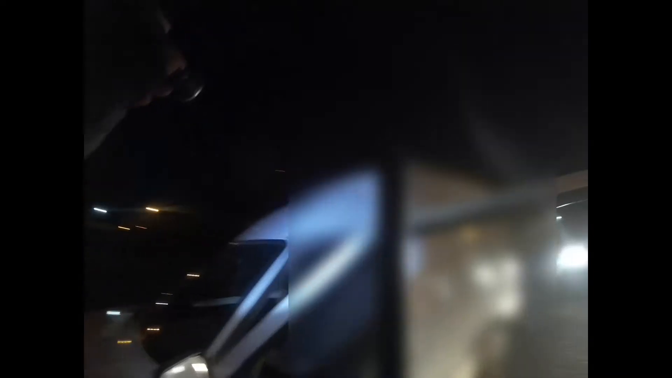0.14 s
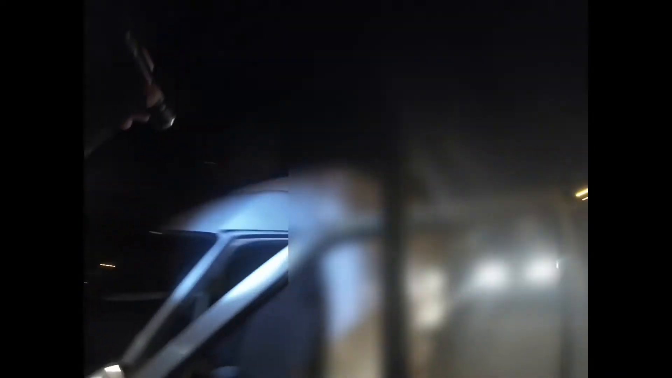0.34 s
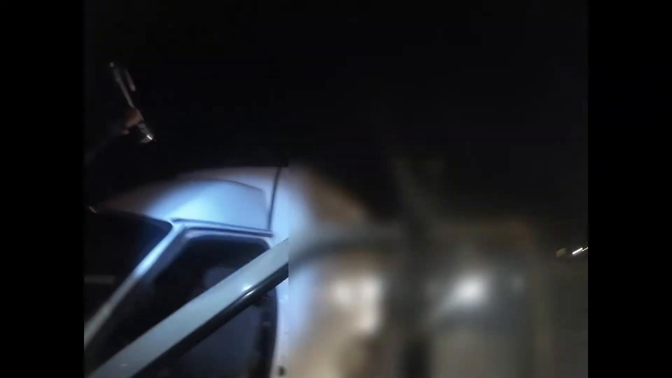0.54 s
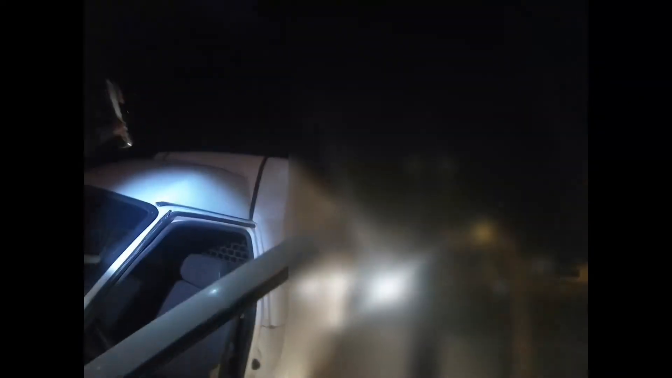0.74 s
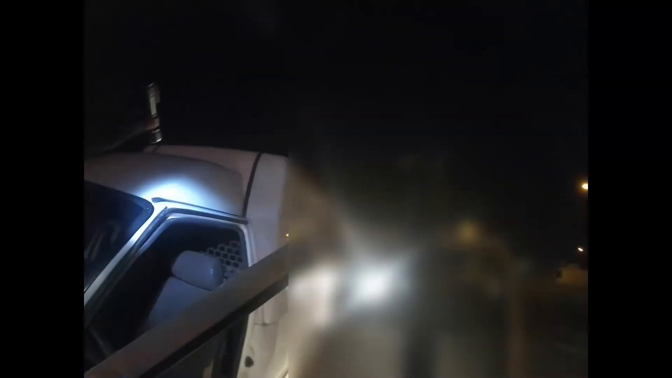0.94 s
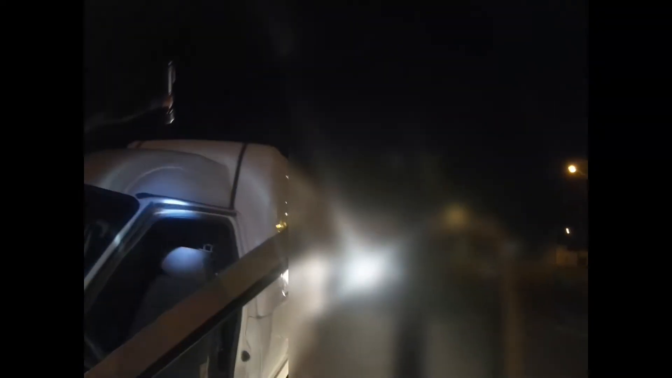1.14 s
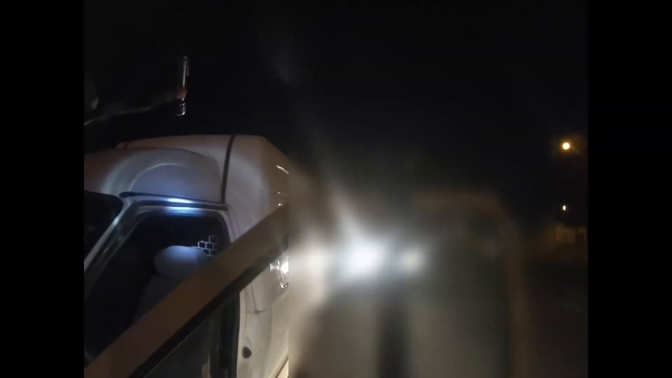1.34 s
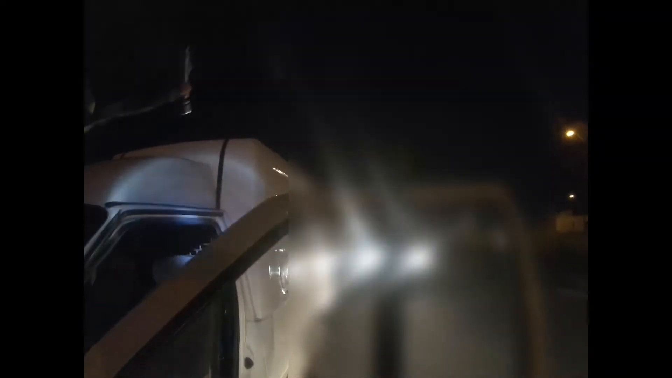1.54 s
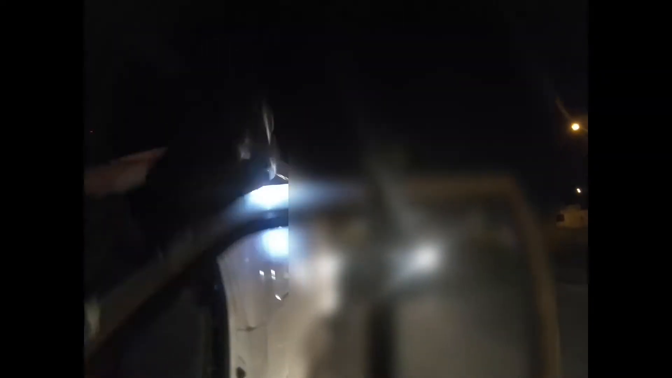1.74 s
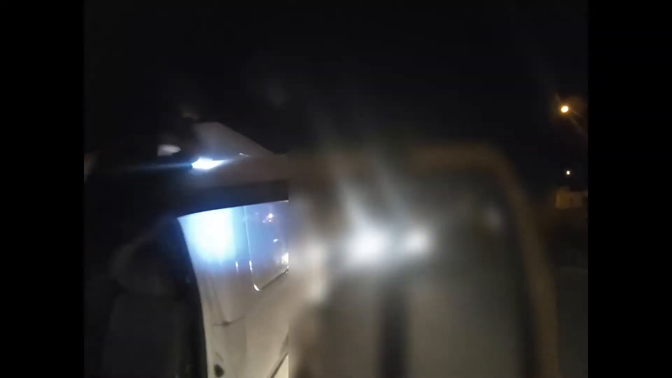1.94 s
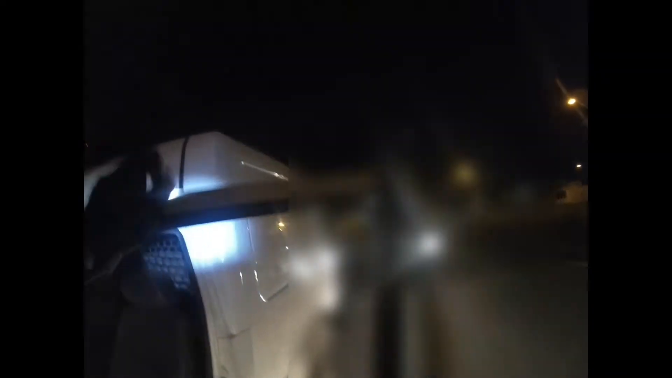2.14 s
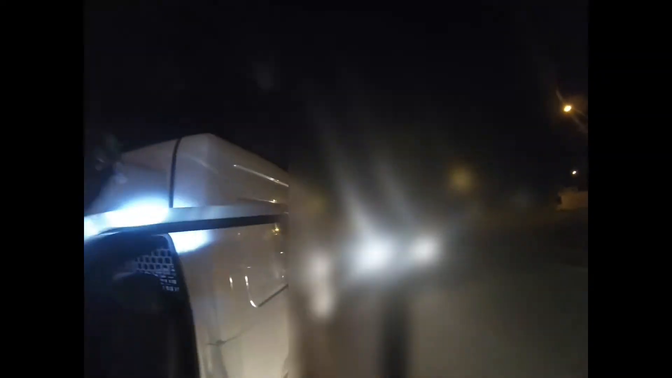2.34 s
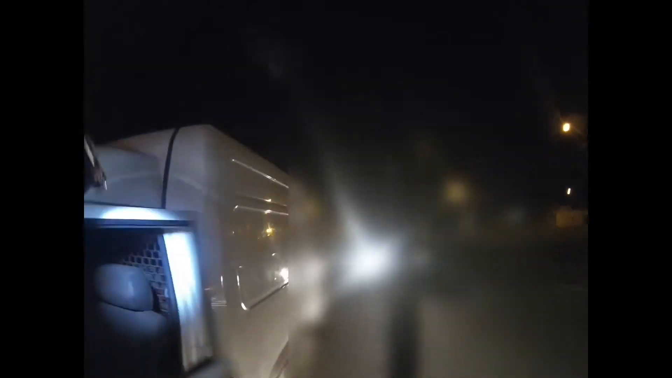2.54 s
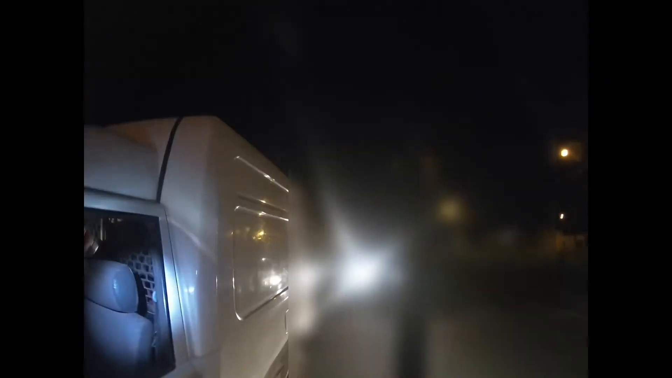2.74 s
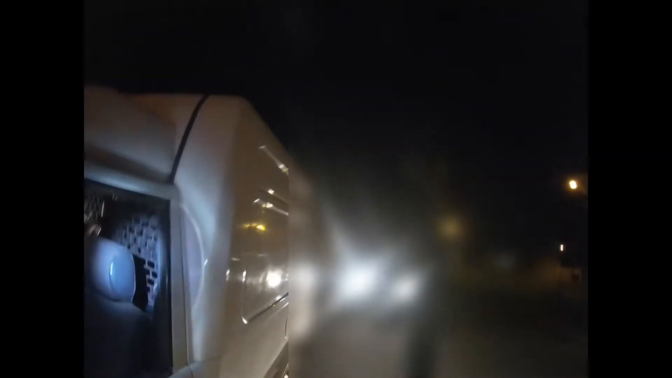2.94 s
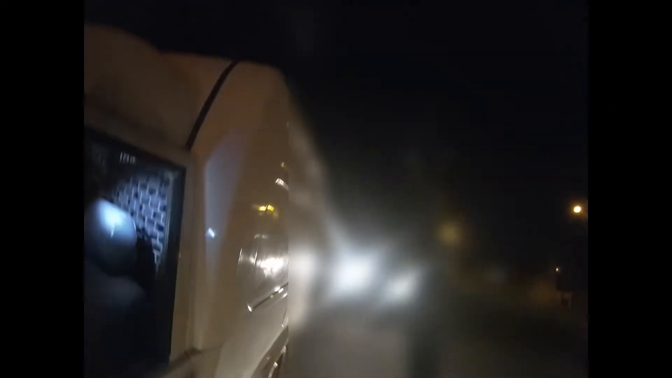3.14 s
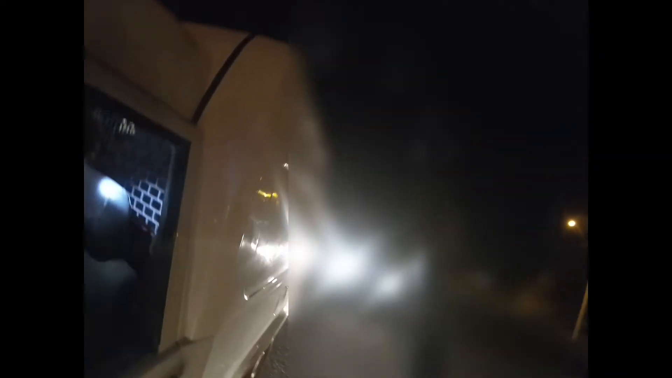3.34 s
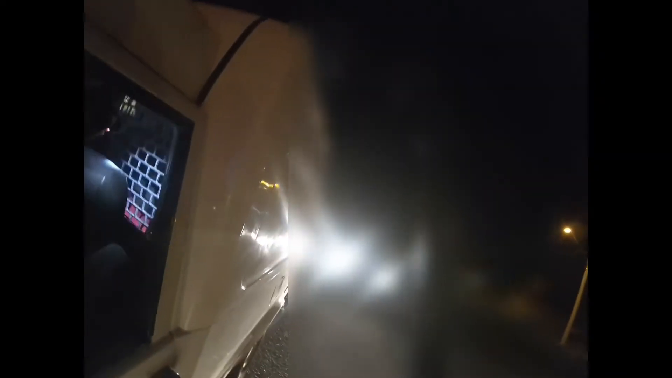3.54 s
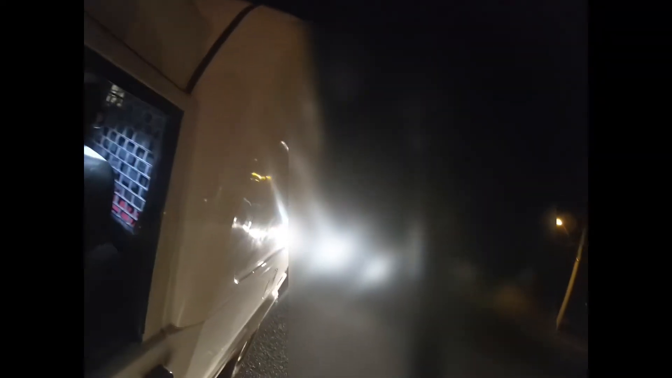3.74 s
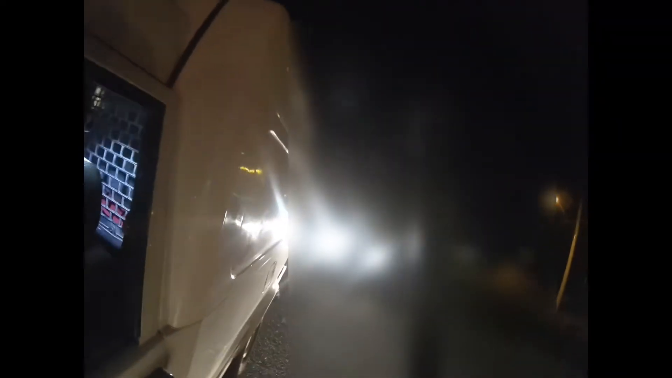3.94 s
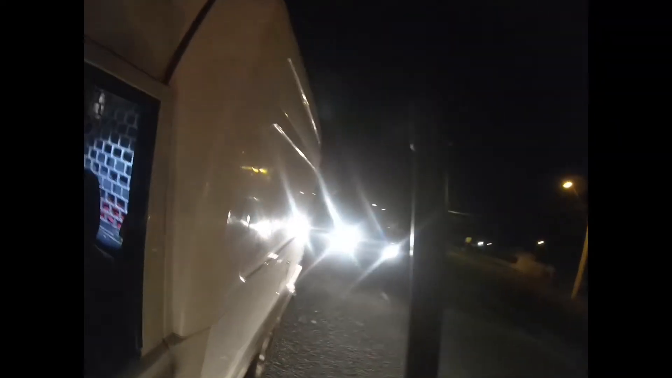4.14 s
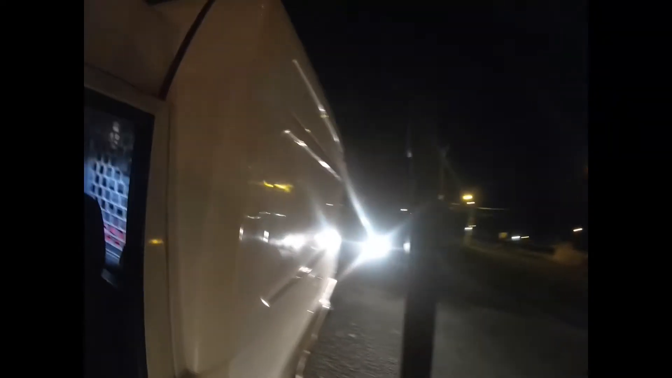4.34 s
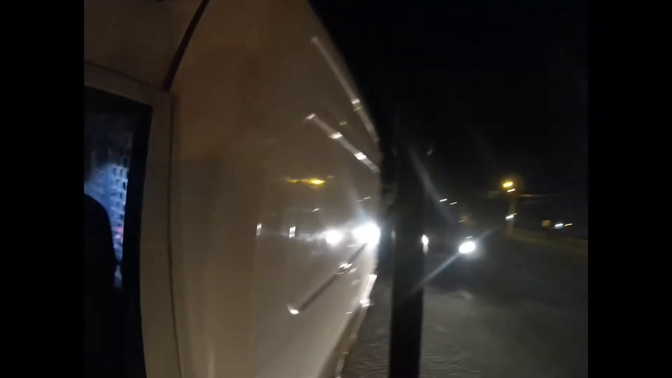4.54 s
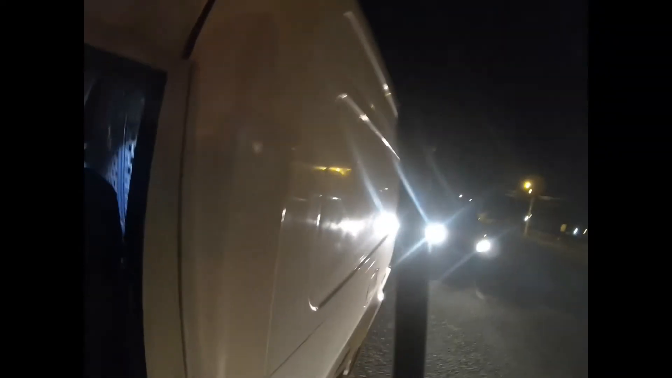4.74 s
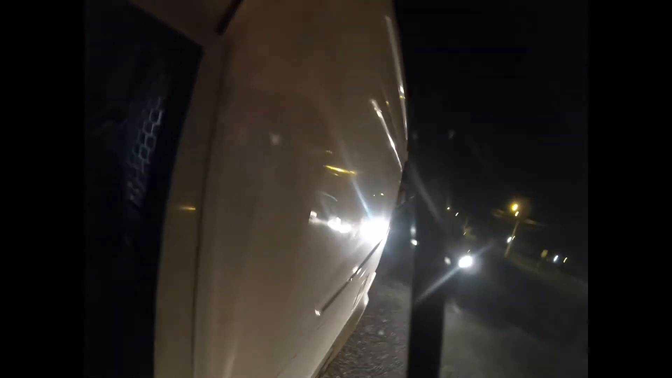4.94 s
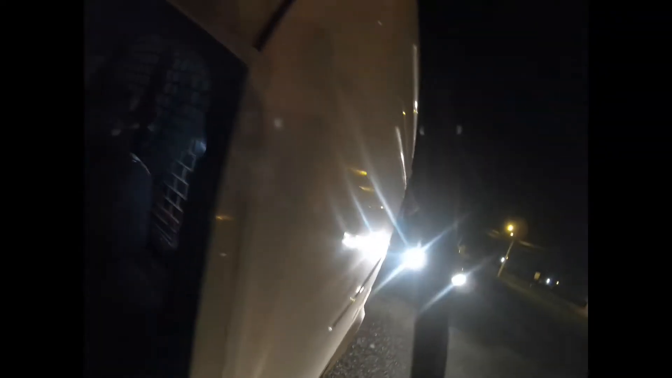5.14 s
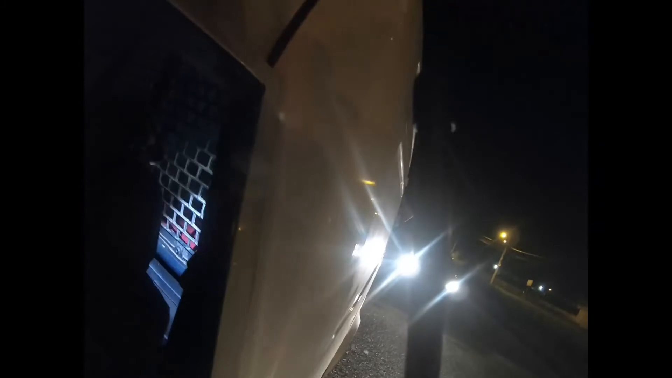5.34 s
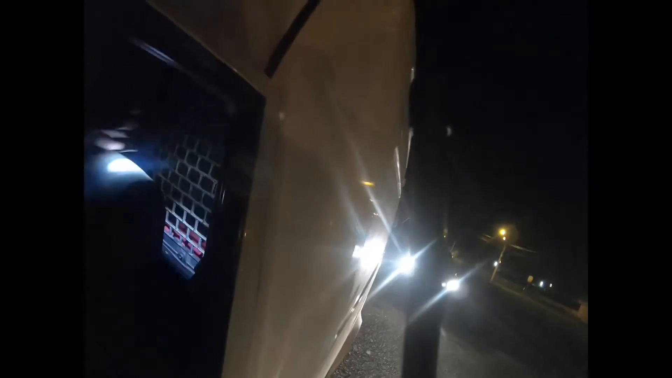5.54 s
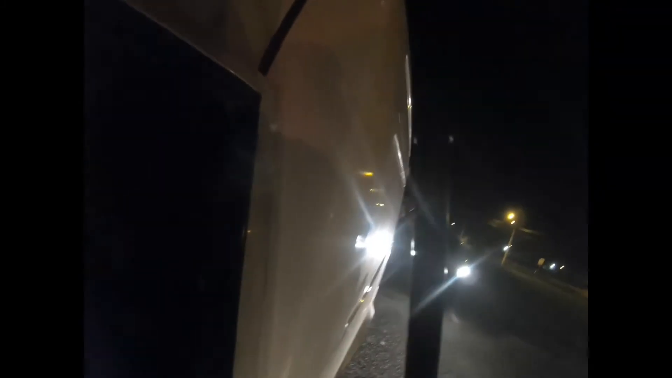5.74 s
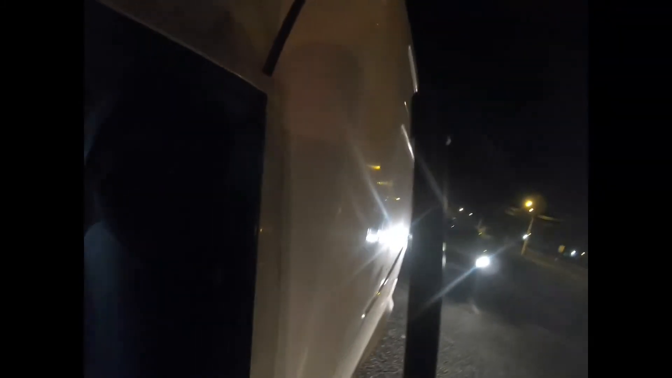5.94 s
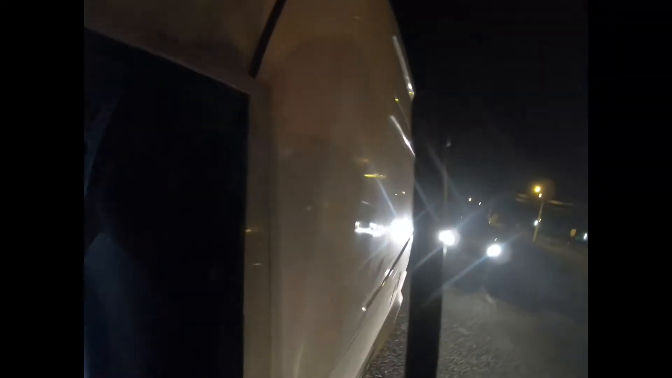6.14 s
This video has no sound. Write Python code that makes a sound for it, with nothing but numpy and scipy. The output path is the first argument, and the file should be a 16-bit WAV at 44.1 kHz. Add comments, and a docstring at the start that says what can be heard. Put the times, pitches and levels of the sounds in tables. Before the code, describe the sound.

A small camera microphone a step from a van picks up road rumble, a lorry pulling away and faint brake squeals. Hands bump the camera; the door latch snaps crisply, then the door slams with a deep thump, quick rebounds and shaking trim and glass. The sound dies quickly with a short street tail. Distant traffic returns, a car revs upward far off, and wind thumps mostly on the right.

```python
"""A van door is unlatched and slammed a step from a small two-port camera beside a road.
Each blow and rebound rings damped panel modes and shakes a noise rattle; the cab air booms at a rising pitch.
The latch clicks with short modes and noise; hands knock the housing and wind puffs on its right port.
Far off, engines are wavering sine orders, brakes and tyre tread are narrow wavering tones,
and the road is coloured noise in half-octave bands."""
import sys
import numpy as np
from scipy import signal
from scipy.fft import rfft, irfft, next_fast_len
from scipy.io import wavfile
from scipy.ndimage import uniform_filter1d

SR = 44100
rng = np.random.default_rng(int(sys.argv[2]) if len(sys.argv) > 2 else 0)


def dump(signal):
    """Clip the signal to [-1, 1] and save it as 16-bit WAV at the path in sys.argv[1]."""
    limited = np.clip(np.atleast_2d(signal).T, -1, 1)
    pcm = np.round(limited * 32767).astype(np.int16)
    wavfile.write(sys.argv[1], SR, pcm)


N = 272229


def undb(db):
    """Decibels to amplitude."""
    return 10 ** (np.asarray(db) / 20)


def unit(x):
    """Scale to an RMS of 1."""
    return x / np.sqrt(np.mean(x ** 2))


def decay(t60, t):
    """Exponential fade that loses 60 dB in t60 seconds."""
    return 10 ** (-3 * t / t60)


def ring(hz, t60, t):
    """One struck mode: a decaying sine."""
    return np.sin(2 * np.pi * hz * t) * decay(t60, t)


def add(out, s, x):
    """Mix x into out from time s, cut at the end."""
    i = int(s * SR)
    out[..., i:i + x.shape[-1]] += x[..., :out.shape[-1] - i]


def curves(table):
    """Table columns joined in time, then a gate that fades 23 ms beyond the table's ends."""
    s, *columns = np.transpose(table)
    t = np.arange(N) / SR
    inside = np.clip(np.minimum(t - s[0], s[-1] - t) / 0.023 + 1, 0, 1)
    return [np.interp(t, s, c) for c in columns] + [inside]


def over_hz(table, hz):
    """Table columns joined on a log-frequency axis."""
    f, *columns = np.transpose(table)
    return [np.interp(np.log(hz + 1), np.log(f), c) for c in columns]


def shape(x, gain):
    """Filter by a function of frequency; the ends are mirrored so that they do not click."""
    pad = 2048
    size = next_fast_len(N + 2 * pad)
    x = np.pad(x, [(0, 0)] * (x.ndim - 1) + [(pad, pad)], mode="reflect", reflect_type="odd")
    hz = np.arange(size // 2 + 1) * SR / size
    return irfft(rfft(x, size) * gain(hz), size)[..., pad:N + pad]


def band_noise(order, edges_hz):
    """Band-passed noise at unit RMS."""
    sos = signal.butter(order, edges_hz, "band", fs=SR, output="sos")
    return unit(signal.sosfilt(sos, rng.standard_normal(N)))


def walk(rate):
    """Random levels held 1 / rate s and slewed twice; spread near 1."""
    k = int(SR / rate)
    held = np.repeat(rng.standard_normal(N // k + 1), k)
    return 1.277 * uniform_filter1d(uniform_filter1d(held, k), k)[:N]


def swell(s, rise_s, fall_s):
    """A bell in time, 1 at its top."""
    t = np.arange(N) / SR - s
    return np.exp(-.5 * (t / np.where(t < 0, rise_s, fall_s)) ** 2)


def whistle(hz, width_hz):
    """A carrier under a slow random envelope that widens the line."""
    turn = np.exp(2j * np.pi * np.cumsum(hz) / SR)
    return unit(walk(width_hz) * turn.real + walk(width_hz) * turn.imag)


# The housing shades the ports: (frequency [Hz], left minus right [dB], left leads by [rad])
PORT_SHADING = [(60, 0, 0), (200, -2, -.3), (400, -5, -.2), (700, -5, .6), (1200, -1, 2.1), (2200, 2, 1.8),
                (3300, 0, .5), (4500, -1, .2), (8000, -1.5, 0), (15000, 0, 0)]


def ports(x):
    """One sound as the two ports hear it: half the shading and half the phase to each side."""
    def gain(hz):
        db, lead = over_hz(PORT_SHADING, hz)
        half = undb(db / 2) * np.exp(.5j * lead)
        return np.array([half, 1 / half])
    return shape(x, gain)


def shade(own):
    """Sound that reaches each port alone is shaded too, in level only."""
    return shape(own, lambda hz: undb(over_hz(PORT_SHADING, hz)[0] * np.array([[.5], [-.5]])))


def spread_gain(colour, alike, hz):
    """Spectra of one common noise and two port-only noises, sharing the power."""
    share = np.clip(over_hz(alike, hz)[0], 0, 1)
    return undb(over_hz(colour, hz)[0]) * np.sqrt([share, 1 - share, 1 - share])


def scattered(colour, alike):
    """Coloured noise from a wide surface: a share reaches both ports alike, the rest each port alone."""
    noise = rng.standard_normal((3, N))
    common, *own = shape(noise, lambda hz: spread_gain(colour, alike, hz))
    return unit(ports(common) + shade(np.array(own)))


PASS_S, PASS_RISE_S = 1.09, 0.38  # a car passes, heard in the road noise and the tread hum
ROAD_PASS_FALL_S = 0.9
GUST_S, GUST_RISE_S, GUST_FALL_S = 4.81, 0.43, 0.33
NEAR_S, NEAR_RISE_S = 6.26, 0.66  # the speeding car nears
BASS_FLICKER_DB, TREBLE_FLICKER_DB = 2, .8
# Borders between the road's level bands: frequencies [Hz]
ROAD_BAND_EDGES = (150, 400, 800, 1700, 2300, 4500)
# Road noise per band, bass first:
# (level [dB], rise as a car passes [dB], rise in the gust [dB], rise as the speeding car nears [dB])
ROAD_BAND_LEVELS = [(-32.5, -3, 5.5, 1.5), (-45.5, -0.5, 4.5, 5.5), (-54.5, 1.5, 3.5, 6),
                    (-56.5, 2.5, 2, -2.5), (-64.5, 4.5, 2.5, 4.5), (-68.5, -1, 3, 8.5), (-70.5, 1.5, 6, 4)]
# Rumble and tyre roar from the road, before band levelling: (frequency [Hz], density [dB per Hz])
ROAD_SPECTRUM = [(15, -37.5), (25, -4), (59, -3), (128, -7.5), (220, -16.5), (363, -27.5), (620, -28.5),
                 (900, -37), (1600, -37), (2500, -42), (3700, -45.5), (4700, -53.5), (6300, -48.5),
                 (8500, -50), (12500, -63.5), (15000, -70)]
# Likeness of the road at the two ports: (frequency [Hz], common share of power [0-1])
ROAD_COMMON = [(30, 0.75), (130, 0.87), (300, 0.95), (700, 0.3), (1400, 0.63), (3000, 0.67), (5000, 0.14),
               (7000, 0.91), (15000, 1)]


def road():
    """Rumble and roar: half-octave noise bands flicker alone and swell together in seven level bands."""
    car_passes = swell(PASS_S, PASS_RISE_S, ROAD_PASS_FALL_S)
    gust = swell(GUST_S, GUST_RISE_S, GUST_FALL_S)
    car_nears = swell(NEAR_S, NEAR_RISE_S, 1)
    levels = np.array(ROAD_BAND_LEVELS) @ np.array([np.ones(N), car_passes, gust, car_nears])

    size = next_fast_len(N)
    hz = np.arange(size // 2 + 1) * SR / size
    spectrum = rfft(rng.standard_normal((3, size))) * spread_gain(ROAD_SPECTRUM, ROAD_COMMON, hz)
    layers = np.zeros((len(levels), 3, N))
    for centre in 22 * 2 ** np.arange(0, 10, .5):
        octaves = np.log2((hz + 1) / centre)
        window = np.cos(np.pi / 2 * np.clip(2 * octaves, -1, 1)) ** 2
        band = irfft(spectrum * window, size)[:, :N]
        flicker_db = TREBLE_FLICKER_DB if centre > 600 else BASS_FLICKER_DB
        layers[np.searchsorted(ROAD_BAND_EDGES, centre)] += band * undb(flicker_db * walk(11))

    total = 0
    for db, layer in zip(levels, layers):
        # one port hears the common noise and one port-only noise
        port_rms = np.sqrt(np.mean(np.sum(layer[:2] ** 2, axis=0)))
        total = total + undb(db) * layer / port_rms
    return ports(total[0]) + shade(total[1:])


def tone(hz, db, wobble=0.00604, waver_db=1.0):
    """An engine line: a sine whose pitch and level waver a little."""
    level = np.sqrt(2) * undb(db + waver_db * walk(5.5))
    return level * np.sin(2 * np.pi * np.cumsum(hz * (1 + wobble * walk(5))) / SR)


# Second far engine: (time [s], line frequency [Hz], level [dB])
FAR_ENGINE = [(0, 126.8, -62), (2.5, 140.7, -44.5), (4.2, 148.3, -44), (6.17, 139.6, -45.5)]


def far_engine():
    """The firing line of an engine far down the road, followed in pitch and level."""
    hz, db, _ = curves(FAR_ENGINE)
    return tone(hz, db)


LORRY_HZ, LORRY_HZ_PER_S = 39.1, 6.9  # firing line at the start, and its climb
# Lorry's firing line: (time [s], level [dB])
LORRY_LINE = [(0, -71), (.25, -34), (1.6, -37.5), (2, -30), (2.6, -37.5), (3.1, -34.5), (3.6, -33.5),
              (4.4, -35.5), (4.7, -45), (4.9, -65)]


def lorry():
    """A lorry's firing line climbs steadily as it pulls away."""
    db, inside = curves(LORRY_LINE)
    return inside * tone(LORRY_HZ + LORRY_HZ_PER_S * np.arange(N) / SR, db)


# Distant car speeding up: (time [s], shaft rate [Hz])
CAR_SHAFT_RATE = [(2.9, 17), (3.7, 19.8), (4.1, 22.6), (4.7, 27.5), (5, 29), (5.1, 30.1), (5.25, 31.7),
                  (5.4, 33.4), (5.55, 34.1), (5.65, 35.1), (5.78, 36.1), (5.9, 36.9), (6.05, 37.8),
                  (6.2, 38.3)]
# Its level: (time [s], level [dB], extra for orders above the fifth [dB])
CAR_LEVEL = [(2.9, -34, -35), (3.7, -47, -32.5), (4.1, -38.5, -30), (4.7, -45, -19), (5.0, -36.5, -12),
             (5.22, -39, -4), (5.45, -30.5, -6.5), (5.65, -45, -0.5), (5.9, -42, 0.5), (6.08, -40, 1),
             (6.2, -38.5, -3.5)]
# Its engine orders: (multiple of shaft rate, relative level [dB])
CAR_ORDER_LEVELS = [(2, -15), (3, -6.5), (4, -2.5), (5, -8.5), (6, -0.5), (7, -2), (10, -9), (11, -6),
                    (12, -15.5)]
# Its exhaust resonances: (frequency [Hz], gain [dB])
EXHAUST_GAIN = [(30, -20), (55, -10), (75, -15), (90, 7.5), (118, 6), (150, -4.5), (195, -7.5), (212, -0.5),
                (228, 4.5), (239, -17.5), (249, 4.5), (266, -5.5), (280, -12), (300, -14), (345, -14),
                (362, -8.5), (376, -4), (392, -13.5), (415, -34), (455, -9), (520, -14)]


def car():
    """The car's orders swell as they climb through its exhaust resonances."""
    shaft_hz, _ = curves(CAR_SHAFT_RATE)
    db, upper_db, inside = curves(CAR_LEVEL)
    out = np.zeros(N)
    for order, order_db in CAR_ORDER_LEVELS:
        hz = order * shaft_hz
        level = db + order_db + over_hz(EXHAUST_GAIN, hz)[0] + upper_db * (order > 5)
        out += inside * tone(hz, level, wobble=0.00504, waver_db=2.5)
    return out


TREAD_WANDER, TREAD_WAVER_DB = .01, 2.5  # fraction of pitch; level
TREAD_SWELL_DB, TREAD_FALL_S = 6.5, 0.82
# Tread hum of the passing car: (frequency [Hz], level before the swell [dB], envelope rate [Hz])
TREAD_HUM = [(905, -50, 100), (1190, -53, 130), (1000, -46, 600)]


def tread():
    """Tyre tread hums in wandering lines that swell with the passing car."""
    near = swell(PASS_S, PASS_RISE_S, TREAD_FALL_S)
    out = np.zeros(N)
    for hz, db, width_hz in TREAD_HUM:
        level = undb(db + TREAD_SWELL_DB * (near - 1.5) + TREAD_WAVER_DB * walk(6.83)) * np.sqrt(near)
        out += level * whistle(hz * (1 + TREAD_WANDER * walk(9)), width_hz)
    return out


SQUEAL_EDGE_S, SQUEAL_WAVER_DB = 0.085, 3
# Faint brake squeals: (time [s], swell [s], length [s], frequency [Hz], sag [Hz per s],
# level [dB], fade [dB per s], envelope rate [Hz])
BRAKE_SQUEALS = [(0.05, 0.16, 0.9, 7670, 140, -57.5, 11.5, 330), (0.852, 0.13, 0.51, 7570, 93, -72, 4, 396),
                 (2.835, 0.26, 0.77, 6250, 3.3, -56.5, 31.5, 90.5),
                 (4.658, 0.092, 0.39, 6220, 170, -63, 12, 90)]


def squeals():
    """Brake squeals sag in pitch and fade as the wheel slows."""
    out = np.zeros(N)
    for s, rise, length, hz, sag, db, fade_db, width_hz in BRAKE_SQUEALS:
        t = np.arange(N) / SR - s
        on = np.clip(np.minimum(t / rise, (length - t) / SQUEAL_EDGE_S), 0, 1)
        level = undb(db - fade_db * t + SQUEAL_WAVER_DB * walk(11))
        out += on * level * whistle(hz - sag * t, width_hz)
    return out


def buffeting():
    """Steady wind buffets each port alone as low, unevenly swelling noise."""
    noise = unit(shape(rng.standard_normal((2, N)), lambda hz: hz / (1 + (hz / 130) ** 3.35)))
    left_db, right_db = -48, -43
    return undb([left_db + 4.6 * walk(10.0), right_db + 4.6 * walk(13)]) * noise


PUFF_HZ, PUFF_SPREAD = 111.1, 0.097  # mean pitch; spread as a fraction
PUFF_RISE_S, PUFF_FALL_S = 0.00891, 0.01755
PUFF_RUSH_DB = -19  # rush under the thud
SMALL_PUFFS, SMALL_PUFF_DB, SMALL_PUFF_SPREAD_DB = 18, -23.5, 4.5
# Strong wind puffs on the right port: (time [s], level [dB])
STRONG_PUFFS = [(0.031, -18.5), (0.064, -14.5), (0.863, -20.5), (1.33, -17.5), (1.658, -26), (1.731, -17.5),
                (2.356, -15.5), (3.395, -15.5), (4.521, -19), (4.586, -14.5), (4.684, -8), (4.892, -13),
                (4.971, -15), (5.045, -10.5), (5.113, -8)]


def puffs():
    """Wind thuds on the right port in short low waves; the left takes a weak inverted share."""
    out = np.zeros((2, N))
    t = np.arange(-int(.03 * SR), int(.2 * SR)) / SR
    rush = unit(shape(rng.standard_normal(N), lambda hz: hz ** 2 / (1 + (hz / 200) ** 5.3)))
    small = []
    for _ in range(SMALL_PUFFS):
        s = .03 + (N / SR - .03) * rng.random()
        small.append((s, SMALL_PUFF_DB + SMALL_PUFF_SPREAD_DB * rng.standard_normal()))
    envelope = np.exp(-.5 * (t / np.where(t < 0, PUFF_RISE_S, PUFF_FALL_S)) ** 2)
    for s, db in STRONG_PUFFS + small:
        hz = PUFF_HZ * (1 + PUFF_SPREAD * rng.standard_normal())
        wave = np.cos(2 * np.pi * hz * t + 2 * np.pi * rng.random())
        # eddies tear off the rim and rush above the thud
        wave += undb(PUFF_RUSH_DB) * np.roll(rush, -int(s * SR))[:len(t)]
        add(out, s + t[0], undb(db) * np.array([[-.15], [1]]) * envelope * wave)
    return out


KNOCK_T60_S = 0.032
SCUFF_BAND_HZ, SCUFF_DB, SCUFF_T60_S = (220, 684), -11.5, 0.044  # rough body of a knock
# Knocks on the camera housing: (time [s], level [dB], frequency [Hz], left minus right [dB])
HOUSING_KNOCKS = [(0.263, -18.5, 405, -6), (.279, -23, 450, -10), (.291, -27, 405, 1),
                  (.302, -22.5, 428, -6), (4.579, -24, 300, -22), (4.62, -20, 327, -13.5),
                  (4.758, -28, 625, -8), (4.77, -29, 403, -5)]


def knocks():
    """Knocks ring two short modes of the housing with a noisy scuff."""
    out, t = np.zeros((2, N)), np.arange(int(.1 * SR)) / SR
    noise = band_noise(3, SCUFF_BAND_HZ)
    onset = np.sin(np.pi / 2 * np.minimum(t / 0.0032, 1)) ** 2
    for s, db, hz, pan_db in HOUSING_KNOCKS:
        modes = ring(hz, KNOCK_T60_S, t) + 0.29 * ring(1.28 * hz, KNOCK_T60_S, t)
        scuff = undb(SCUFF_DB) * noise[int(s * SR):][:len(t)] * decay(SCUFF_T60_S, t)
        levels = undb(db + np.array([[pan_db], [-pan_db]]) / 2)
        add(out, s, levels * (modes + scuff) * onset)
    return out


LATCH_RING_DB, LATCH_RING_SLOPE = -22, 1.45  # ring of the hardest click; dB of ring lost per dB of softer crack
# Latch and small clicks a step away: (time [s], crack level [dB], treble tick level [dB], t60 [s])
LATCH_CLICKS = [(.264, -50, -57, 0.039), (.282, -48, -62, 0.045), (0.662, -50.5, -59, 0.033),
                (1.251, -64, -53, 0.013), (1.319, -74, -55, 0.011), (1.338, -68, -51, .012),
                (1.8114, -40, -70, .02), (1.813, -21.5, -27.5, 0.017), (1.815, -33, -33, 0.011),
                (1.8175, -31.5, -48, 0.064), (1.829, -50, -57, 0.065), (1.84, -52, -51, 0.014),
                (1.852, -56, -47, 0.016), (2.1433, -40.5, -77, 0.068), (3.329, -53, -52, 0.011),
                (4.02, -62, -56.5, 0.046), (4.578, -68, -52, 0.038), (4.752, -45.5, -70, 0.067),
                (4.759, -44, -73, 0.07), (4.767, -47, -79, 0.05), (4.927, -75, -52, .02),
                (5.03, -61, -53, 0.018), (5.799, -55, -69, 0.024)]
# Latch modes: (frequency [Hz], relative level [dB], t60 [s])
LATCH_MODES = [(215, -9.5, 0.22), (385, -13.5, .1), (674, -13, 0.088), (980, -26, 0.029),
               (1370, -4.5, 0.043), (1490, 1.5, 0.032), (1920, 9, 0.021), (2100, 0, 0.0079),
               (2300, 3, 0.022), (2980, -18, 0.036), (3170, -9, 0.035), (3540, -4.5, 0.014),
               (4240, -5, 0.013), (5300, -6, 0.012)]
# Crack of a contact: (frequency [Hz], relative density [dB per Hz])
CRACK_SPECTRUM = [(250, -6), (400, 1), (700, 1), (1100, -10), (2200, -1.5), (3700, -12.5), (5000, -30),
                  (7000, -50), (15000, -65)]
# Likeness of the crack at the ports: (frequency [Hz], common share of power [0-1])
CRACK_COMMON = [(400, 1), (1500, 0.68), (3000, 0.34), (15000, .6)]
# Bright tick of a contact: (frequency [Hz], relative density [dB per Hz])
TICK_SPECTRUM = [(3000, -30), (5200, -19), (6300, -4), (7300, -6), (8500, -4), (10500, -13), (12500, -39),
                 (15000, -27)]
# Likeness of the tick at the ports: (frequency [Hz], common share of power [0-1])
TICK_COMMON = [(3000, 0.32), (15000, 0.22)]


def clicks():
    """Short contacts ring the latch modes, with a crack and a bright tick on top."""
    ringing, crack, tick = np.zeros((3, N))
    t = np.arange(int(.15 * SR)) / SR
    modes = sum(undb(db) * ring(hz, t60, t) for hz, db, t60 in LATCH_MODES)
    modes = modes * np.minimum(t / 0.00015, 1) ** 2
    hardest_db = max(row[1] for row in LATCH_CLICKS)
    for s, crack_db, tick_db, t60 in LATCH_CLICKS:
        ring_db = LATCH_RING_DB + LATCH_RING_SLOPE * (crack_db - hardest_db)
        fade = decay(t60, t) * np.minimum(t / .0004, 1) ** 2
        add(ringing, s, undb(ring_db) * modes)
        add(crack, s, undb(crack_db) * fade)
        add(tick, s, undb(tick_db) * fade)
    cracks = crack * scattered(CRACK_SPECTRUM, CRACK_COMMON)
    return ports(ringing) + cracks + tick * scattered(TICK_SPECTRUM, TICK_COMMON)


BOOM_S, BOOM_HZ, BOOM_HZ_PER_S, BOOM_DB = 2.622, 60.75, 97.7, -5.5
BOOM_ATTACK_S, BOOM_HOLD_S, BOOM_RELEASE_S = 0.016, 0.055, 0.012
AFTER_RING_DB, AFTER_RING_T60_S = -9.5, 0.98  # relative to the boom


def boom():
    """The cab air's note climbs while the door presses it, then rings on more faintly."""
    t = np.maximum(np.arange(N) / SR - BOOM_S, 0)
    held = BOOM_ATTACK_S + BOOM_HOLD_S
    press = np.clip(np.minimum(t / BOOM_ATTACK_S, 1 - (t - held) / BOOM_RELEASE_S), 0, 1)
    after = (1 - press) * (t > held) * undb(AFTER_RING_DB) * decay(AFTER_RING_T60_S, t - held)
    hz = BOOM_HZ + BOOM_HZ_PER_S * np.minimum(t, held + BOOM_RELEASE_S)
    return undb(BOOM_DB) * (press + after) * np.sin(2 * np.pi * np.cumsum(hz) / SR)


FIRST_HARD_DB, REBOUND_HARD_DB = 4, -7.5  # tilt of the body modes per octave above 200 Hz
SNAP_DB, SNAP_T60_S = 7, .025  # hard contact at each rebound, over its rattle treble
THUD_BAND_HZ, THUD_DB, THUD_T60_S = (110, 340), -13, 0.2  # dense low modes of the van side; dB re body
RATTLE_SPLIT_HZ = 2000  # the treble of the rattle starts here
# Door on its frame and its rebounds, a step away:
# (time [s], rattle level [dB], rattle t60 [s], body level [dB], rattle treble re rattle [dB])
DOOR_BLOWS = [(2.613, -17, 0.31, -4, -9), (2.633, -12, 0.11, -9, -3.5), (2.646, -23.5, 0.15, -8.5, 4),
              (2.673, -26.5, 0.18, -11, -2), (2.688, -21.5, 0.13, -14, -15), (2.71, -26.5, 0.097, -12, 3.5),
              (2.722, -35, 0.057, -16.5, -1), (2.755, -43, 0.069, -16, 4), (2.773, -53, 0.037, -19, -2),
              (2.803, -44, 0.03, -23, -2), (2.832, -48, 0.11, -24, 2)]
# Door skin and cab air: (frequency [Hz], relative level before the tilt [dB], t60 [s])
BODY_MODES = [(141.4, -5, 0.22), (190.4, 1.5, 0.16), (411, 5, 0.047), (562, -13, 0.052), (780, -18, 0.06)]
# Rattle of trim and glass: (frequency [Hz], relative density [dB per Hz])
RATTLE_SPECTRUM = [(200, -10), (400, 0.5), (600, -1), (798, -2), (1050, -7), (1660, -7.5), (1930, -14),
                   (2430, -13), (3760, -16), (4550, -27), (7420, -24), (8620, -31.5), (14100, -40.5),
                   (15500, -51)]
# Likeness of the rattle at the ports: (frequency [Hz], common share of power [0-1])
RATTLE_COMMON = [(400, .97), (750, 0.65), (1500, .85), (3000, .65), (5000, .25), (15000, 0.7)]


def door():
    """Each blow shoves the panel modes through the rubber seal and shakes trim and glass into a rattle."""
    panel, thud, rattle = boom(), np.zeros(N), np.zeros((2, N))
    t = np.arange(int(.5 * SR)) / SR
    seal_onset = 1 - np.exp(-t / 0.011)
    rattle_onset = 1 - np.exp(-t / 0.0014)
    snap = undb(SNAP_DB) * decay(SNAP_T60_S, t) * np.array([[0], [1]])
    # each rebound lands elsewhere and shifts the modes
    shift = 1 + rng.uniform(-0.084, 0.07, (len(DOOR_BLOWS), len(BODY_MODES)))
    shift[0] = 1
    for k, (s, db, t60, body_db, treble_db) in enumerate(DOOR_BLOWS):
        hard_db = REBOUND_HARD_DB if k else FIRST_HARD_DB
        body = np.zeros(len(t))
        for (hz, mode_db, mode_t60), move in zip(BODY_MODES, shift[k]):
            body += undb(mode_db + hard_db * np.log2(hz / 200)) * ring(hz * move, mode_t60, t)
        add(panel, s, undb(body_db) * body * seal_onset)
        add(thud, s, undb(body_db + THUD_DB) * decay(THUD_T60_S, t) * seal_onset)
        shaking = decay(t60, t) + snap * (k > 0)
        add(rattle, s, undb([[db], [db + treble_db]]) * shaking * rattle_onset)
    panel += thud * band_noise(2, THUD_BAND_HZ)
    # loose parts chatter unevenly
    rattle *= undb(2.0 * walk(150))
    shaken = scattered(RATTLE_SPECTRUM, RATTLE_COMMON)
    low = shape(shaken, lambda hz: 1 / (1 + (hz / RATTLE_SPLIT_HZ) ** 4))
    return ports(panel) + rattle[0] * low + rattle[1] * (shaken - low)


STREET_T60_S, STREET_DB = 0.077, -21


def street(near):
    """The van side and the kerb send back a short scattered tail."""
    t = np.arange(int(.5 * SR)) / SR
    tail = rng.standard_normal((2, len(t))) * decay(STREET_T60_S, t) * (t > .008)
    tail /= np.sqrt(np.sum(tail[0] ** 2))
    return undb(STREET_DB) * signal.fftconvolve(near, tail, axes=1)[:, :N]


def scene():
    """Distant traffic, wind and handling at the camera, and the close door with its street tail."""
    distant = far_engine() + lorry() + car() + tread() + squeals()
    at_camera = buffeting() + puffs() + knocks()
    near = clicks() + door()
    return road() + ports(distant) + at_camera + near + street(near)


GAIN_TOP_DB, GAIN_SLOPE = -21, 0.39  # threshold; dB of cut per dB above it
GAIN_RELEASE_DB_PER_S, GAIN_WINDOW_S = 4, 0.018
TOP_HZ = 15100


def record(dry):
    """Gain control ducks under loud sound and creeps back at a steady rate; the recorder cuts the top."""
    size = int(GAIN_WINDOW_S * SR)
    # the window looks back in time
    power = uniform_filter1d(np.mean(dry ** 2, axis=0), size, origin=(size - 1) // 2)
    level_db = 10 * np.log10(np.abs(power) + 1e-12)
    cut_db = GAIN_SLOPE * np.maximum(level_db - GAIN_TOP_DB, 0)
    creep = GAIN_RELEASE_DB_PER_S * np.arange(N) / SR
    cut_db = np.maximum.accumulate(cut_db + creep) - creep
    low_pass = signal.ellip(8, .2, 70, TOP_HZ, fs=SR, output="sos")
    return signal.sosfilt(low_pass, dry * undb(-cut_db))


dry = scene()
out = record(dry)
dump(out)
```